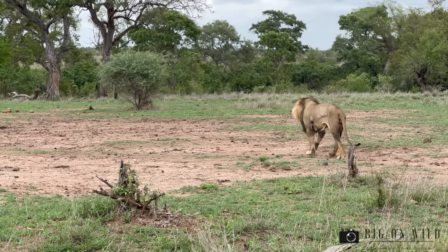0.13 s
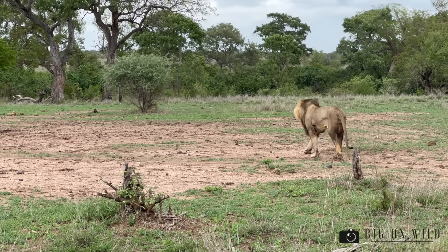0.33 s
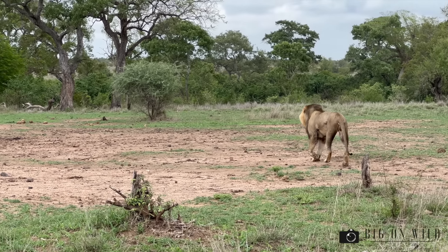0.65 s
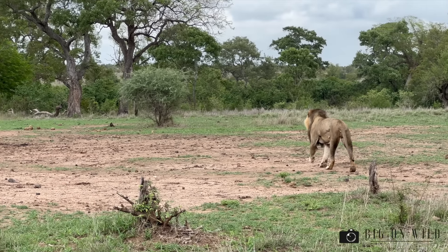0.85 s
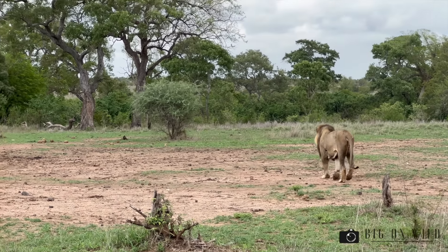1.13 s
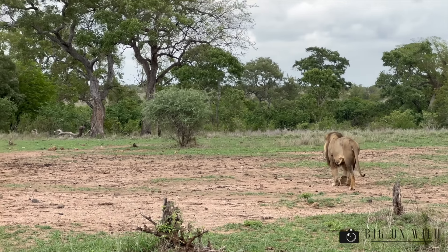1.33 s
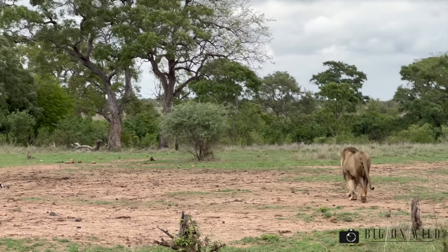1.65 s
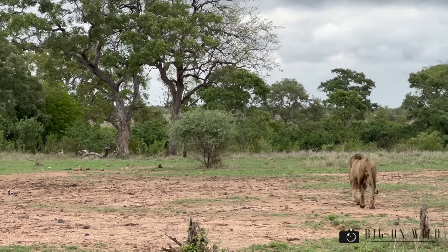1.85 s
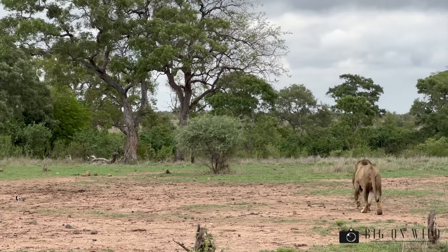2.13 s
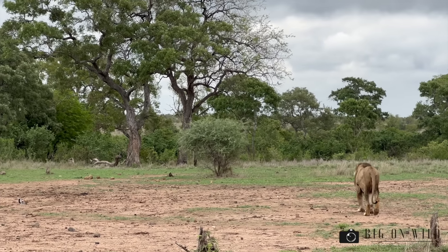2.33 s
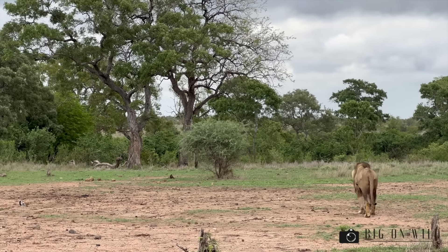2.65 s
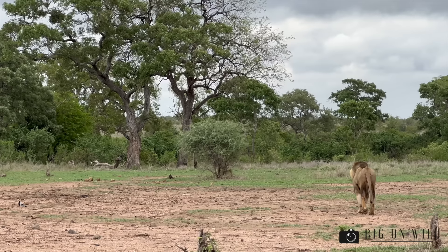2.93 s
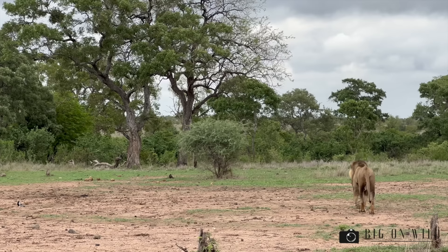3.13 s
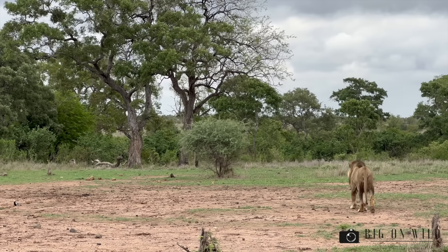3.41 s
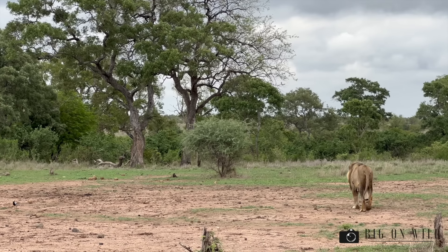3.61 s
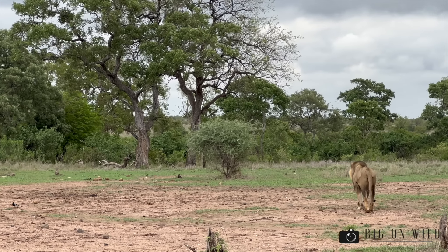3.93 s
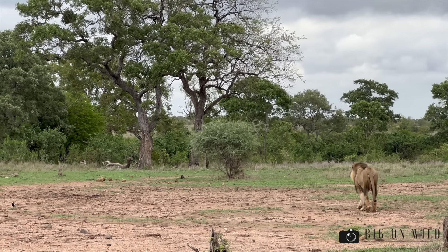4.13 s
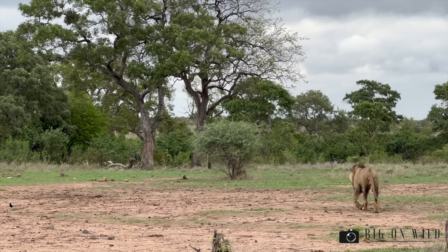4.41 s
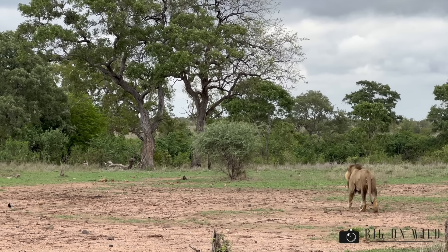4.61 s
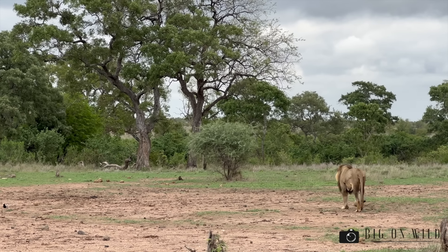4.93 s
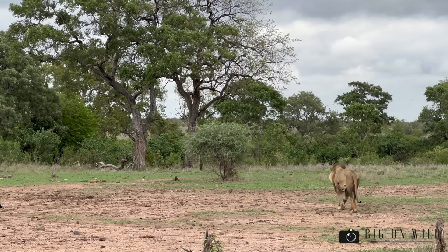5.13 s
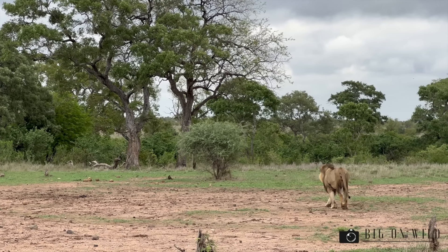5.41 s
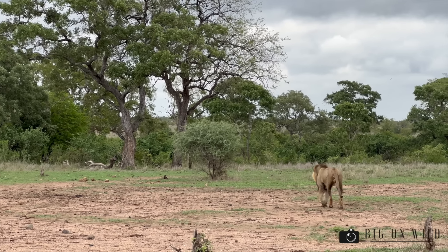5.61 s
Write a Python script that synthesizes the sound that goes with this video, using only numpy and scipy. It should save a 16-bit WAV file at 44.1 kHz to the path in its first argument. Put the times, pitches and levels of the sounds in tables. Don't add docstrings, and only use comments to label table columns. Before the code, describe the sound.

A male lion gives two long, raspy roars, then three short rough grunts, over open bush with faint birds and insects.

```python
import sys
import numpy as np
from scipy import signal
from scipy.fft import rfft, irfft
from scipy.io import wavfile
from scipy.ndimage import uniform_filter1d

SR = 44100
rng = np.random.default_rng(int(sys.argv[2]) if len(sys.argv) > 2 else 0)


def nominal_scale(level):
    x = np.asarray(level, float) / 20
    return 10 ** x


def unload_audio(sound):
    columns = np.transpose(np.atleast_2d(sound))
    steps = np.round(np.clip(columns, -1, 1) * 32767)
    wavfile.write(sys.argv[1], SR, steps.astype(np.int16))


N = 254016


def rms_one(x):
    return x / np.sqrt(np.mean(x ** 2) + 1e-20)


def in_time(calls):
    t = np.arange(N) / SR
    s, *columns = np.transpose(np.concatenate(calls))
    gate = 0
    for call in calls:
        start, end = call[0][0], call[-1][0]
        gate = gate + np.interp(t, [start - .015, start, end, end + .015], [0, 1, 1, 0])
    return [np.interp(t, s, c) for c in columns] + [gate]


def at_hz(points, hz):
    table_hz, values = np.transpose(points)
    return np.interp(np.log(hz + 1), np.log(table_hz), values)


def drift(rate):
    r = np.exp(-2 * np.pi * rate / SR)
    return rms_one(signal.lfilter([1], [1, -2 * r, r * r], rng.standard_normal(N + SR))[SR:])


def resonances(x, modes, patchy_db=0.0):
    out = 0
    for k, (hz, width, level_db) in enumerate(modes):
        r = np.exp(-np.pi * width / SR)
        b = (1 - r * r) / 2 * np.array([1, 0, -1])
        a = [1, -2 * r * np.cos(2 * np.pi * hz / SR), r * r]
        ringing = signal.lfilter(b, a, signal.lfilter(b, a, x))
        out = out + (-1) ** k * nominal_scale(level_db + patchy_db * drift(22.0)) * ringing
    return out


def evened(x, span_s):
    return x / np.sqrt(uniform_filter1d(x ** 2, size=int(span_s * SR)) + 1e-12)


def pulses(per_s, spread_db):
    cycle = np.floor(np.cumsum(per_s) / SR).astype(int)
    return np.diff(cycle, prepend=0) * nominal_scale(spread_db * rng.standard_normal(N)[cycle]) + 1e-18


def note(at_s, level_db, hz, length_s, fall, overtone_db, warble=0.0):
    out = np.zeros(N)
    u = np.arange(int(length_s * SR)) / (length_s * SR)
    glide_hz = hz * (1 + fall * (.5 - u) + warble * drift(130)[:len(u)])
    phase = 2 * np.pi * np.cumsum(glide_hz) / SR
    wave = np.sin(phase) + nominal_scale(overtone_db) * (np.sin(2 * phase) + np.sin(3 * phase))
    out[int(at_s * SR):][:len(u)] = nominal_scale(level_db) * np.sin(np.pi * u ** .7) ** 0.5 * wave
    return out


# (f/Hz, level/dB per Hz)
AIR_COLOUR = [(25, -10), (50, -6.5), (90, -7.5), (160, -2.5), (260, -17.5), (500, -28.5), (1000, -29.5),
              (2500, -33), (4200, -44.5), (6500, -34), (10000, -33.5), (13000, -35), (15000, -36),
              (16000, -70)]


def air():
    hz = np.arange(N // 2 + 1) * SR / N
    white = rfft(rng.standard_normal((2, N))) * nominal_scale(at_hz(AIR_COLOUR, hz))
    mid, side = irfft(white, N)
    wind = irfft(white[0] / (1 + (hz / 200) ** 4), N)
    gusts = wind * (nominal_scale(5.0 * drift(4)) - 1)
    return nominal_scale(-66.5) * rms_one(mid + gusts + .6 * side * [[1], [-1]])


# (start t/s, end t/s, peak level/dB, swell/dB)
FROG_TRILL = (3.1, 5.55, -81.5, 5.0)


def frog():
    start, end, peak_db, swell_db = FROG_TRILL
    swell = [(start, peak_db - swell_db), (.75 * end + .25 * start, peak_db), (end, peak_db - swell_db / 2)]
    level_db, gate = in_time([swell])
    beat = np.cos(2 * np.pi * 15.65 * (np.arange(N) / SR - 4.25))
    throb = np.maximum(beat, 0) ** 1.5 * nominal_scale(1.5 * drift(8))
    phase = 2 * np.pi * np.cumsum(1550 + 45 * drift(90)) / SR
    return nominal_scale(level_db + 6) * gate * throb * np.sin(phase)


# (level/dB, swell/dB, swells/per s)
CICADA_BUZZ = (-86.5, 3.0, 1.5)


def cicada():
    level, swell, rate = CICADA_BUZZ
    level_db = level + swell * drift(rate)
    phase = 2 * np.pi * np.cumsum(12950 + 70 * drift(1.5) + 40 * drift(300)) / SR
    tone = np.sin(phase) * nominal_scale(2.2 * drift(30))
    ticks = resonances(pulses(np.full(N, 30.0), spread_db=0.5), [(12700, 900, 14)])
    return nominal_scale(level_db + 4.0) * (tone + ticks)


# (t/s, peak level/dB)
GRASS_SNAPS = [
    (4.215, -72),
    (5.5487, -76.5),
]


def grass_snaps():
    snaps = np.zeros(N)
    for s, db in GRASS_SNAPS:
        burst = rng.standard_normal(300) * np.exp(-np.arange(300) / 60.0)
        snaps[int(s * SR):][:300] = nominal_scale(db - 12) * burst
    return snaps


def whistle(s, length, hz, db, fade_db):
    attack_s, sag, hook = .02, .015, 0.03
    return [(s, hz * (1 - sag), db - 11),
            (s + attack_s, hz, db),
            (s + length - attack_s, hz * (1 - sag), db - fade_db),
            (s + length, hz * (1 - hook), db - fade_db - 2)]


# (t/s, length/s, f/Hz, level/dB, fade/dB)
LONG_WHISTLES = [
    (0.922, 0.38, 2600, -75, 0.5),
    (1.374, 0.12, 2810, -75, 5),
    (1.514, 0.1, 2630, -74.5, 10),
    (1.707, 0.17, 2826, -69.5, 12.5),
    (2.001, .17, 2850, -69, 11.5),
    (2.275, 0.13, 2800, -73, 6.5),
]


def long_whistles():
    hz, level_db, gate = in_time([whistle(*row) for row in LONG_WHISTLES])
    phase = 2 * np.pi * np.cumsum(hz) / SR
    wave = np.sin(phase) + nominal_scale(-24) * np.sin(2 * phase)
    return np.sqrt(2) * nominal_scale(level_db + 1.5 * drift(30)) * gate * wave


# (t/s, peak level/dB, f/Hz)
FALLING_CHIRPS = [
    (1.4738, -55, 2694),
    (1.6827, -58.5, 2443),
    (2.173, -56.5, 2530),
    (2.396, -58, 2470),
    (2.6, -55.5, 2375),
]


def chirps():
    return sum(note(s, db, hz, .048, .055, -33) for s, db, hz in FALLING_CHIRPS)


# (t/s, peak level/dB, f/Hz)
TREBLE_PIPS = [
    (0.8983, -66, 3820),
    (0.9625, -54, 3400),
    (1.244, -60, 3360),
    (1.85, -58, 4110),
]
# (t/s, peak level/dB, f/Hz)
DEEP_PIPS = [(1.07, -60.5, 1500), (1.2371, -75, 1300), (1.4012, -71, 1490), (1.5464, -68, 1400),
             (1.7549, -75, 1450), (1.8492, -67.5, 1382), (1.953, -73, 1580), (2.045, -66, 1480)]


def pips():
    return sum(note(s, db - 7.5, hz, 0.027, 0.0414, -39) for s, db, hz in TREBLE_PIPS + DEEP_PIPS)


# (t/s, peak level/dB, f/Hz, length/s)
CHATTER_NOTES = [(0.8799, -64.5, 2870, 0.031), (0.9794, -60, 2970, 0.03), (0.996, -71, 2800, 0.057),
                 (1.0819, -64.5, 2850, 0.035), (1.1494, -63, 2850, 0.022), (1.2094, -65, 2950, 0.031),
                 (1.2466, -63.5, 3010, 0.026), (1.3189, -59.5, 2780, 0.06), (1.3553, -66, 2900, 0.028),
                 (1.6137, -68, 2980, 0.025), (1.7894, -78, 2770, 0.031), (1.864, -61.5, 3130, 0.036),
                 (1.897, -70, 2800, 0.05), (1.9435, -68, 2955, 0.032), (2.0193, -65.5, 2750, 0.059),
                 (2.3194, -76, 2860, 0.04)]


def chatter():
    out = np.zeros(N)
    for s, db, hz, length in CHATTER_NOTES:
        for part, fall in ((.78, .25), (1.15, -.3)):
            out += note(s, db - 5, hz * part, length, fall, -28, warble=.11)
    return out


# (t/s, peak level/dB, f/Hz, length/s)
DISTANT_CALLS = [
    (4.259, -85, 2670, 0.19),
    (5.057, -85.5, 3180, 0.053),
    (5.278, -84, 3200, 0.078),
]


def far_calls():
    return sum(note(s, db, hz, length, 0.084, -29) for s, db, hz, length in DISTANT_CALLS)


# (f/Hz, decay/s)
ECHO_DECAY = [(60, 0.25), (150, 1.75), (400, 1.3), (1200, 2.7), (4000, 0.24)]


def tree_line(x):
    t = np.arange(2 * SR) / SR
    edges = 40 * 2 ** np.arange(0, 7.1, .7)
    tail = 0
    for low, high in zip(edges, edges[1:]):
        sos = signal.butter(2, [low, high], "band", fs=SR, output="sos")
        band = signal.sosfilt(sos, rng.standard_normal((2, len(t))))
        tail = tail + band * nominal_scale(-60 * t / at_hz(ECHO_DECAY, np.sqrt(low * high)))
    tail = (tail[0] + 0.31 * tail[1] * [[1], [-1]]) * np.clip((t - .06) / 0.19, 0, 1)
    tail = tail / np.sqrt(np.sum(tail[0] ** 2)) * 8
    return signal.fftconvolve(x[None], tail, axes=1)[:, :N]


GRUNT_BREATH_DB = -50.5


def grunt(s, db, hz, rough, hold):
    attack_s, release_s, end_db = .115, 0.2, -64
    rise, sag = .17, .14
    fade_s = .7 * release_s * (db - end_db) / 46
    times = s + np.cumsum([0, 0.53 * attack_s, 0.49 * attack_s, hold, 0.33 * release_s, fade_s])
    pitch = hz * (1 + np.array([rise, 0, 0, -sag / 2, -sag, -1.3 * sag]))
    roughness = [.9, .8, rough, rough + .1, 1, 1]
    tone = [-48.5, db - 13, db, db - 5, db - 10, end_db]
    breath = GRUNT_BREATH_DB + 0.55 * (db + 18.5) - np.array([42, 8.2, .1, .2, 18, 68.5])
    slaps_per_s = np.full(len(times), 50)
    return np.transpose([times, pitch, roughness, slaps_per_s]), np.transpose([times, tone, breath])


# (t/s, pitch f/Hz, roughness/0-1, slaps of loose tissue/per s)
ROAR_FOLDS = [
    [(0, 156, .65, 27), (.26, 158, .65, 29), (.32, 198, .55, 32), (.38, 191, .1, 45), (.58, 155, .12, 48),
     (.715, 154, .45, 50), (.77, 122, .9, 48), (.876, 108, .9, 48), (1.02, 116, .9, 48)],
    [(2.18, 135, .8, 55), (2.255, 126, .25, 60), (2.35, 155, .18, 58), (2.425, 158, .15, 55),
     (2.5, 194, .12, 52), (2.59, 196, .1, 50), (2.82, 159, .12, 50), (3.04, 144, .5, 50),
     (3.12, 115, .9, 48)],
]
# (t/s, tone level/dB, breath level/dB)
ROAR_EFFORT = [
    [(0, -36, -56.5), (.2, -34, -59), (.3, -23.5, -55.5), (.39, -13, -50.5), (.675, -9.5, -48.5),
     (.74, -26, -48.5), (.81, -22, -54), (.92, -32, -78.5), (1.0, -54.5, -83)],
    [(2.19, -47.5, -70), (2.27, -21, -45.5), (2.35, -12.5, -49.5), (2.41, -26.5, -51), (2.55, -14, -55),
     (2.74, -11, -50), (3.0, -11.5, -47), (3.13, -27, -52), (3.29, -41.5, -96.5)],
]
# (start t/s, peak tone level/dB, pitch f/Hz, roughness/0-1, hold/s)
SHORT_GRUNTS = [
    (3.764, -20, 119.2, .95, .07),
    (4.632, -12, 135, 0.5, 0.12),
    (5.647, -13.5, 126.5, .55, 0.092),
]


def calls():
    folds, effort = zip(*[grunt(*row) for row in SHORT_GRUNTS])
    pitch, rough, slap_rate, _ = in_time(ROAR_FOLDS + list(folds))
    tone_db, breath_db, calling = in_time(ROAR_EFFORT + list(effort))
    return pitch, rough, slap_rate, tone_db, breath_db, calling


# (from t/s, to t/s, share shut/0-1)
HOOTS = [
    (-.1, 0.389, 0.68),
    (2.367, 2.664, 0.63),
]


def mouth_shut():
    t, move_s, shut = np.arange(N) / SR, 0.0067, 0
    for a, b, share in HOOTS:
        shut = shut + np.interp(t, [a - move_s, a, b, b + move_s], [0, share, share, 0])
    return shut


# (t/s, dip level/dB, half-length/s)
VOICE_CRACKS = [(0.334, 6.5, 0.014), (0.869, 13, 0.03), (2.375, 13, .01), (2.504, 8.5, 0.0062),
                (2.587, 9.5, .009), (3.209, 10, 0.024), (3.888, 10, 0.0078), (4.818, 11, 0.009),
                (4.893, 9, 0.017)]


def cracks():
    t = np.arange(N) / SR
    return sum(-dip_db * np.exp(-((t - s) / half) ** 2) for s, dip_db, half in VOICE_CRACKS)


def layer_levels(pitch, rough, tone_db, breath_db, shut):
    slack = np.maximum(141.8 - pitch, 0)
    spare_db = rough * (tone_db - 28.5 - breath_db)
    second = breath_db + 13 + 24 * shut + 0.28 * slack
    third = breath_db + 8.5 + 0.3749 * slack + 0.15 * shut * (tone_db + 36)
    half = breath_db - 10.5 + 29 * rough + 0.38 * spare_db
    throat = 18.5 + 4 * shut + 0.13 * spare_db
    hiss_fade = 0.47 * (breath_db - GRUNT_BREATH_DB)
    bright = -18 - hiss_fade + 0.09 * slack + 4.5 * rough * (1 - shut) - .1
    chest = -21 + .55 * tone_db - np.maximum(pitch - 125, 0) - 10.5 * (1 - rough)
    return second, third, half, throat, bright, chest


def sung_tone(phase, wobble, first_db, second_db, third_db, between_db, beat_db, crack_db):
    shake_db = beat_db + crack_db
    song = nominal_scale(first_db + .5 * beat_db + crack_db) * np.sin(phase)
    song += nominal_scale(second_db + 1.05 + shake_db + 1.3 * drift(27)) * np.sin(2 * phase + 1.2 + wobble)
    song += nominal_scale(third_db - 1.5 + shake_db + 2.2 * drift(26)) * np.sin(3 * phase + 2 * wobble)
    song += nominal_scale(third_db - 10.5 + shake_db) * np.sin(4 * phase + 3 * wobble)
    between_lines = sum(nominal_scale(-4.0 * k) * np.sin((k + 1.2) * phase + wobble) for k in range(3))
    return np.sqrt(2) * (song + nominal_scale(between_db + beat_db) * between_lines)


def chest_thuds(slaps, breath):
    return evened(resonances(slaps + 0.0045 * breath, [(70, 44, 0.5), (97.2, 6.6, 8.5)]), 0.36)


# (f/Hz, width/Hz, level/dB)
THROAT_MODES = [(135, 66, -4), (163, 150, -1), (303, 92, -4), (325, 77, 4.5), (367, 140, -9.5),
                (470, 9.7, -19)]


def throat_growl(slaps, breath, rough):
    return evened(resonances(slaps * (0.13 + rough) + 0.027 * breath, THROAT_MODES, patchy_db=2.5), 0.26)


# (f/Hz, width/Hz, level/dB)
MOUTH_MODES = [(580, 80, 5), (750, 60, 1.5), (900, 70, 1.5), (1060, 90, -1), (1260, 130, -3)]
# (f/Hz, width/Hz, level/dB)
TEETH_MODES = [(1920, 1000, 5), (2365, 350, 4.5), (3400, 980, -16.5), (4600, 1500, -10.5),
               (6500, 2400, -18)]


def mouth_rasp(phase, wobble, slaps, slap_rate, breath, rough, shut, beat_db, bright_db):
    closures = np.diff((phase + .25 * wobble) // (2 * np.pi), prepend=0) * nominal_scale(2.5 * drift(150))
    jet = .075 * breath * (1 + .8 * np.cos(phase))
    jet *= (.06 + rough * np.clip(slap_rate / 45, .4, 1)) * nominal_scale(.6 * beat_db)
    drive = closures + .4 * rough * (1 - .8 * shut) * slaps + jet
    rasp = evened(resonances(drive, MOUTH_MODES, patchy_db=3.0), .06)
    dull = signal.sosfilt(signal.butter(2, 1100, fs=SR, output="sos"), rasp)
    rasp -= np.clip(.55 * shut, 0, 1) * (rasp - dull)
    hiss = evened(resonances(drive + jet, TEETH_MODES, patchy_db=3.5), .05)
    return rasp + nominal_scale(bright_db) * hiss


def lion():
    pitch, rough, slap_rate, tone_db, breath_db, calling = calls()
    shut, crack_db = mouth_shut(), cracks()
    levels = layer_levels(pitch, rough, tone_db, breath_db, shut)
    second_db, third_db, between_db, throat_db, bright_db, chest_db = levels
    rough = np.clip(rough, 0, 1)
    phase = 2 * np.pi * np.cumsum(pitch * (1 + 0.11 * rough ** 2 * drift(40))) / SR
    slap_rate = slap_rate * nominal_scale(2.2 * drift(12))
    slaps = pulses(slap_rate, spread_db=2.5)
    since_slap = np.cumsum(slap_rate / SR) % 1
    beat_db = rough * uniform_filter1d(5 - 13 * since_slap, size=180)
    wobble = (.3 + rough) * drift(25)
    breath = rng.standard_normal(N)
    song = sung_tone(phase, wobble, tone_db, second_db, third_db, between_db, beat_db, crack_db)
    rasp = mouth_rasp(phase, wobble, slaps, slap_rate, breath, rough, shut, beat_db, bright_db)
    broken = nominal_scale(chest_db) * chest_thuds(slaps, breath)
    broken += nominal_scale(breath_db + .4 * crack_db) * rasp
    broken += nominal_scale(breath_db + throat_db + 0.97 * rough) * throat_growl(slaps, breath, rough)
    voice = (song + broken) * calling
    return signal.sosfilt(signal.butter(2, 42, "high", fs=SR, output="sos"), voice)


def scene():
    roar = lion()
    birds = long_whistles() + chirps() + pips() + chatter() + far_calls()
    small_life = frog() + cicada() + grass_snaps()
    life = (birds + small_life) * nominal_scale([[-1.2], [1.2]])
    return roar + nominal_scale(-59.5) * tree_line(roar) + life + air()


def band_limit(x):
    return signal.sosfilt(signal.butter(12, 15500, fs=SR, output="sos"), x)


# (f/Hz, left minus right level/dB)
PORT_TILT = [(40, -4.5), (100, 2), (160, 3.5), (350, 4.5), (700, 2.5), (1400, 2), (2800, 0.5), (5500, -2.5),
             (12000, 4)]


def record(dry):
    clock_db, clock_hz = -63, 9600
    low = signal.sosfilt(signal.butter(2, 500, fs=SR, output="sos"), dry)
    x = dry + nominal_scale(clock_db) * low * np.sin(2 * np.pi * clock_hz * np.arange(N) / SR)
    x = np.pad(x, [(0, 0), (SR // 4, SR // 4)], mode="reflect", reflect_type="odd")
    x = x * signal.windows.tukey(x.shape[1], .05)
    hz = np.arange(x.shape[1] // 2 + 1) * SR / x.shape[1]
    tilt_db = at_hz(PORT_TILT, hz) / 2 * [[1], [-1]]
    dip_db = -30 * np.exp(-((hz - 8350) / 420) ** 4)
    x = irfft(rfft(x) * nominal_scale(tilt_db + dip_db), x.shape[1])[:, SR // 4:SR // 4 + N]
    mix = x * signal.windows.tukey(N, .0005)
    return band_limit(mix)


dry = scene()
out = record(dry)
unload_audio(out)
```